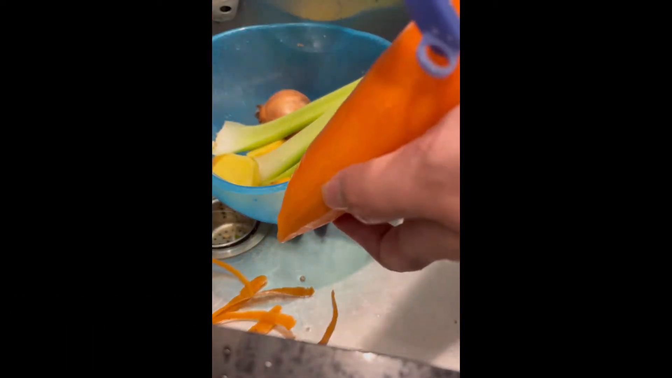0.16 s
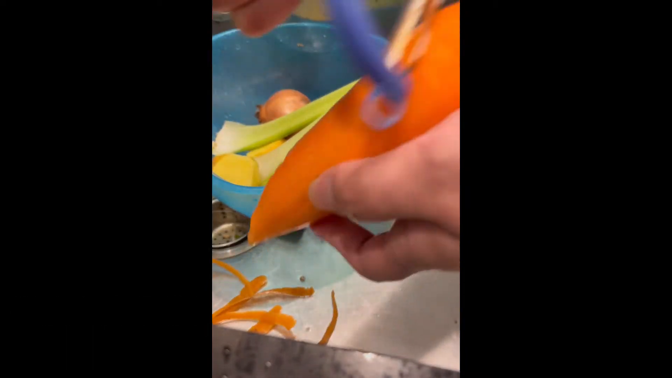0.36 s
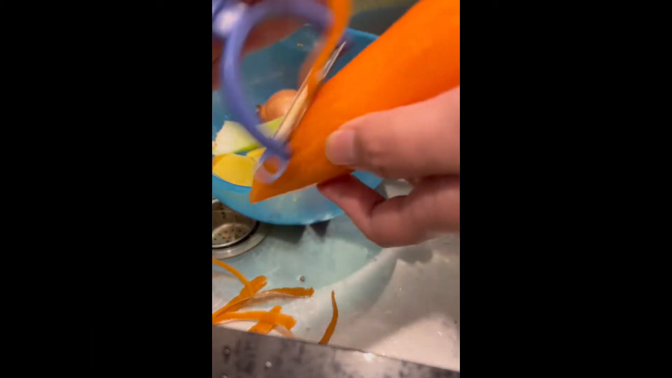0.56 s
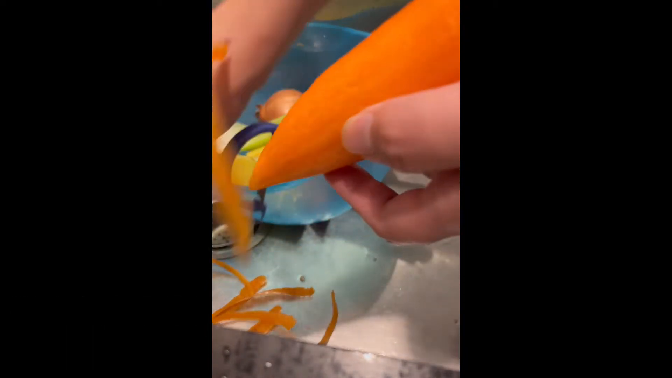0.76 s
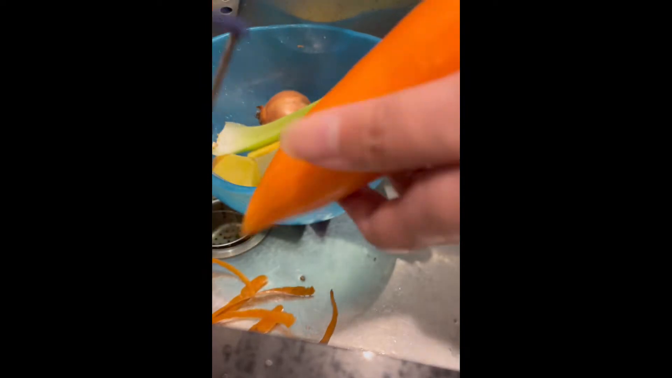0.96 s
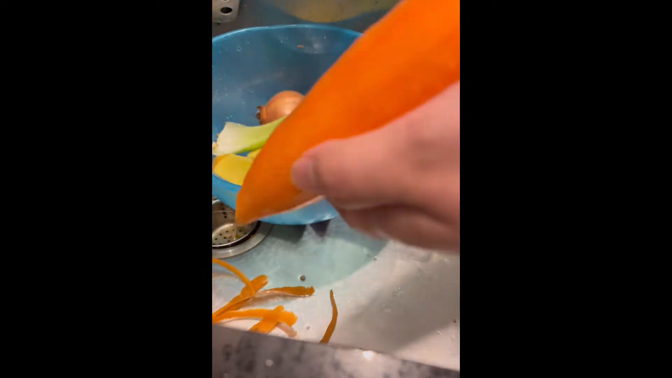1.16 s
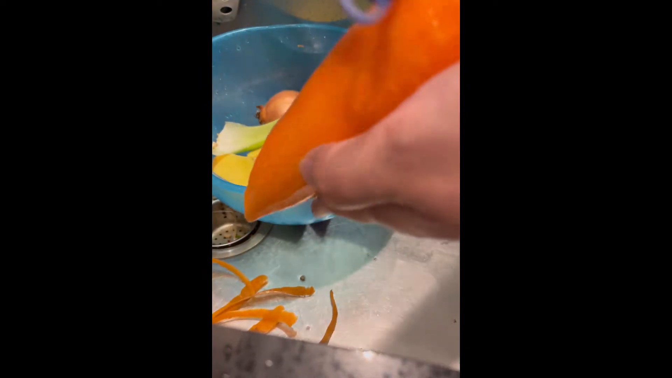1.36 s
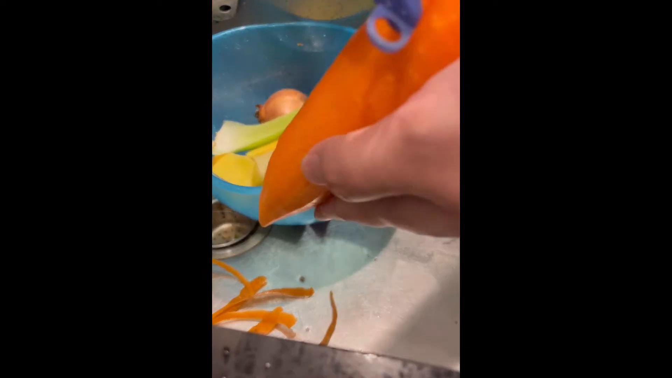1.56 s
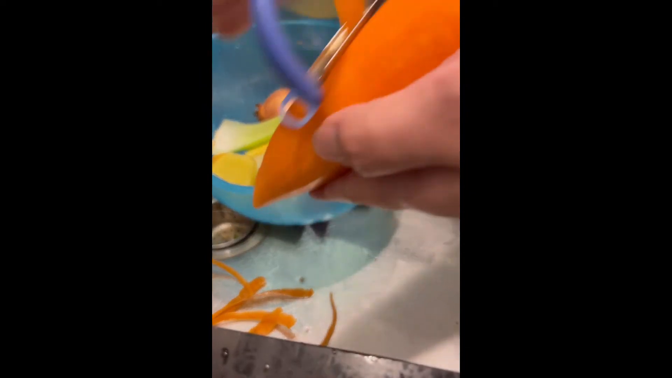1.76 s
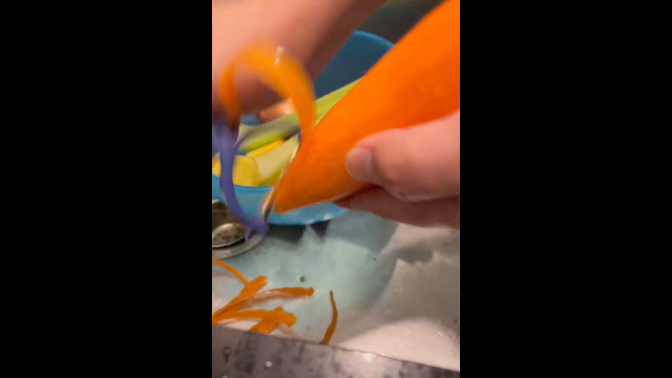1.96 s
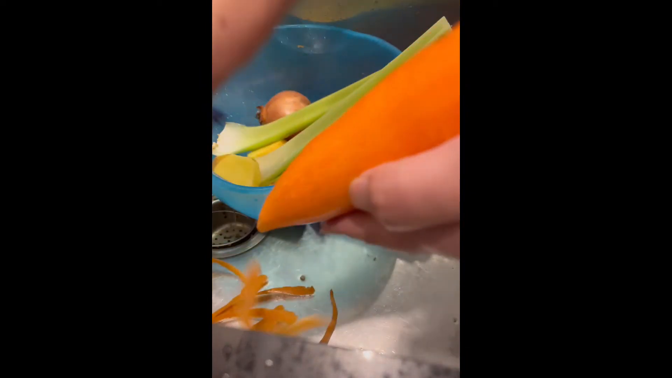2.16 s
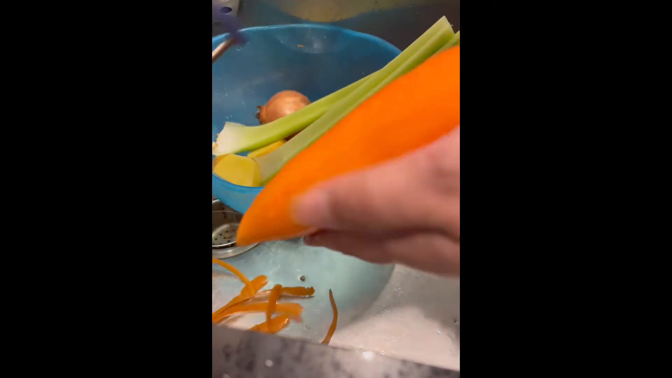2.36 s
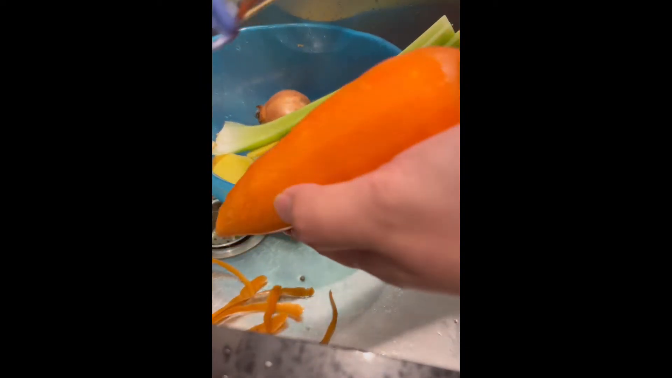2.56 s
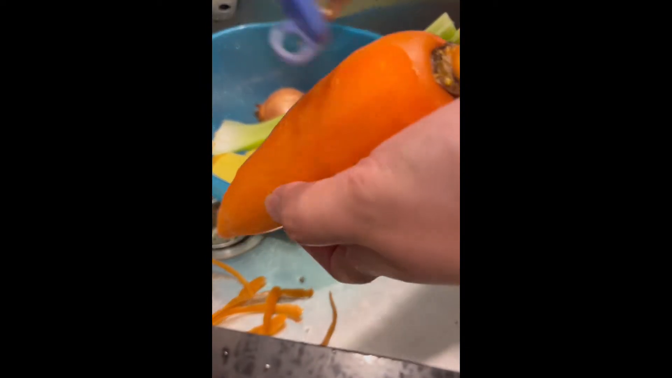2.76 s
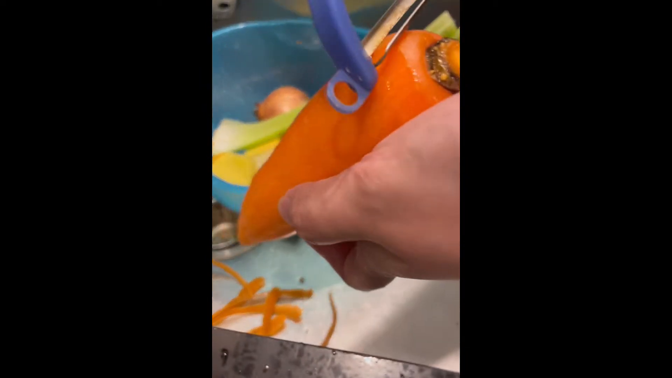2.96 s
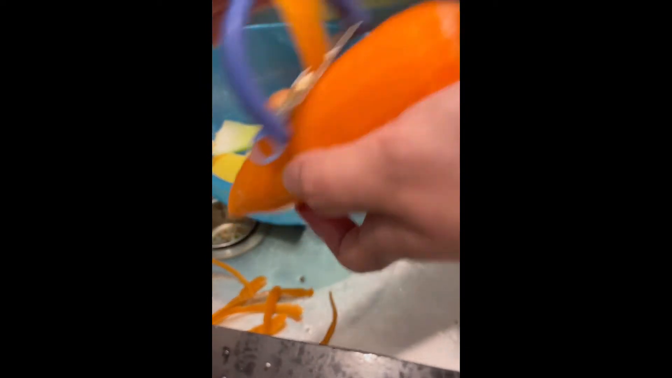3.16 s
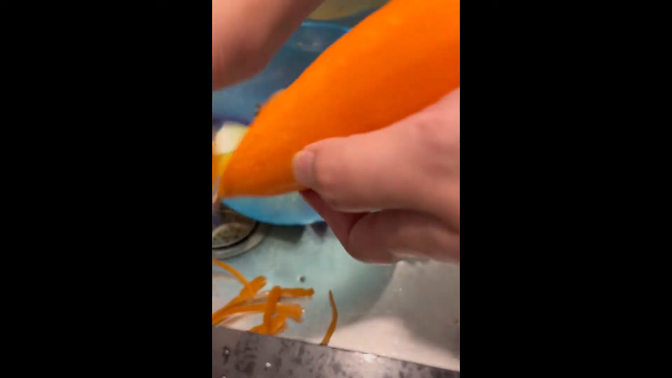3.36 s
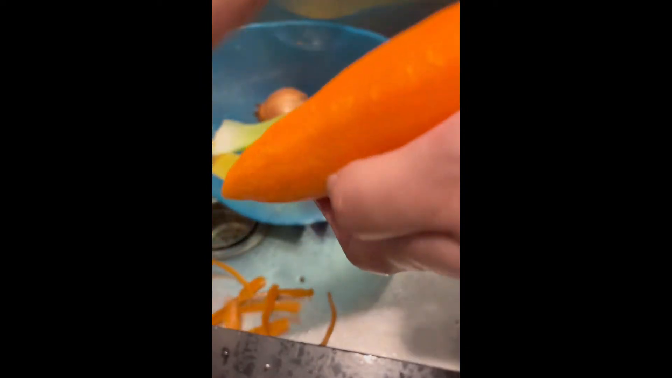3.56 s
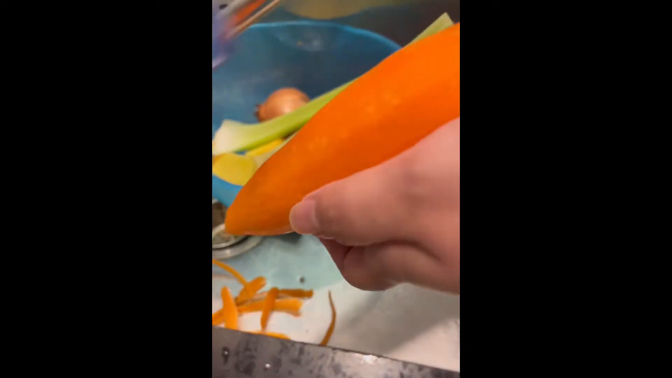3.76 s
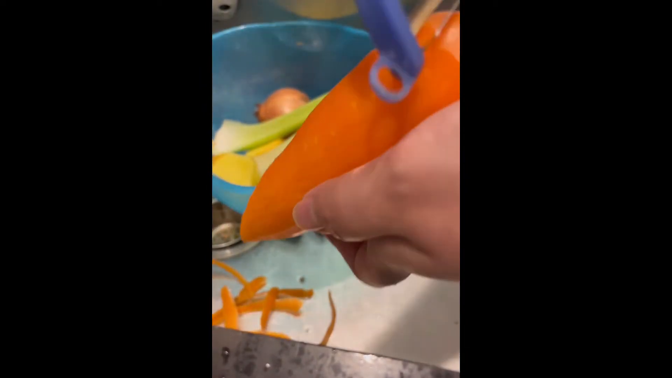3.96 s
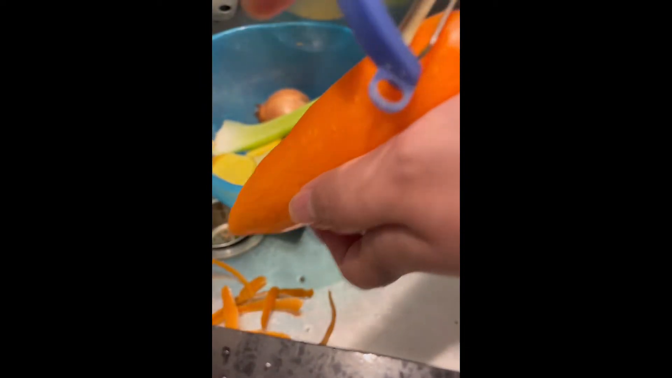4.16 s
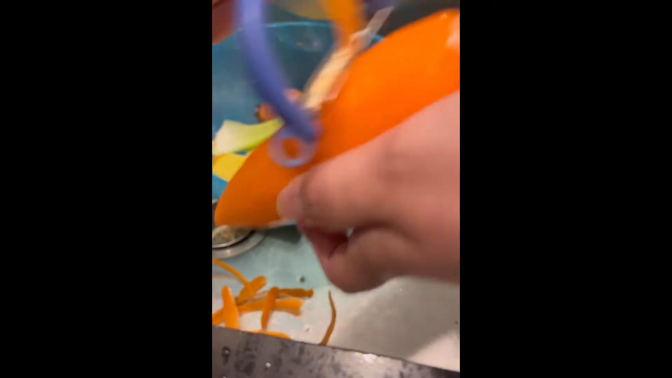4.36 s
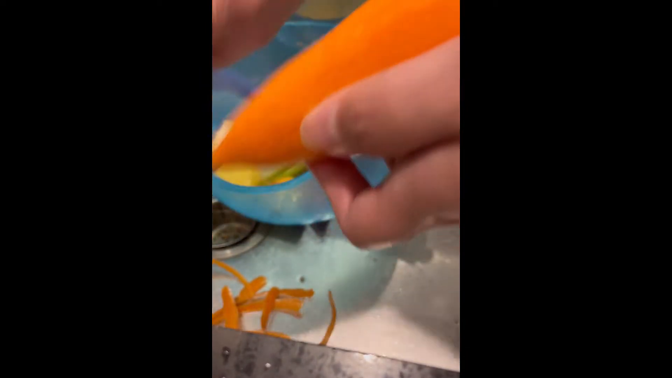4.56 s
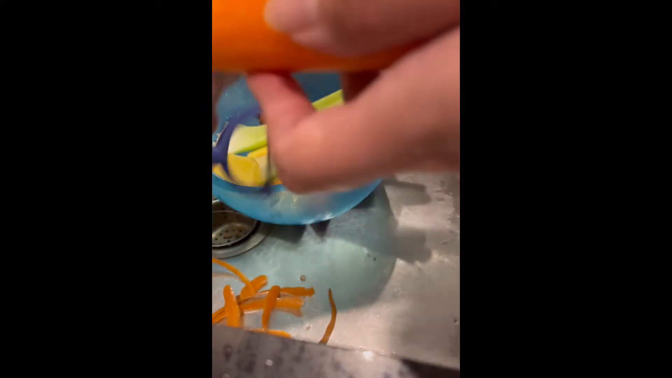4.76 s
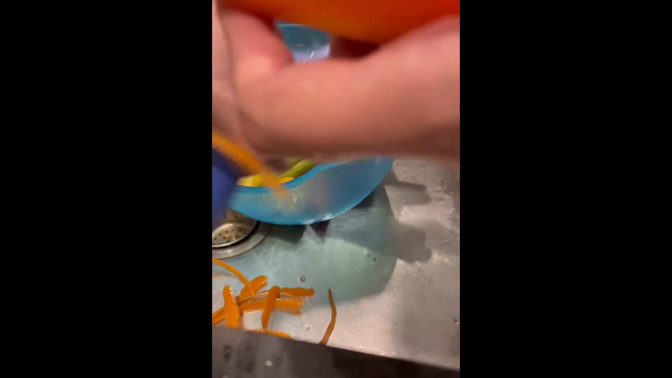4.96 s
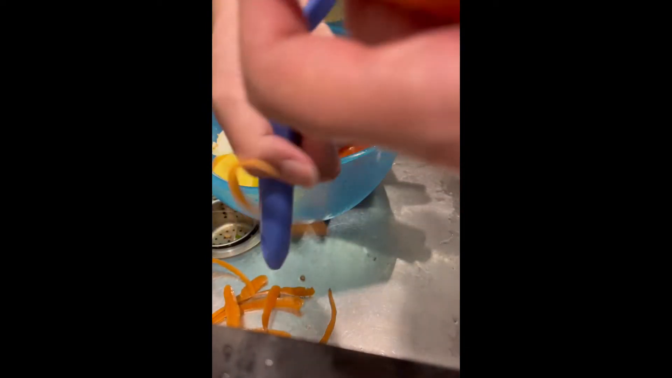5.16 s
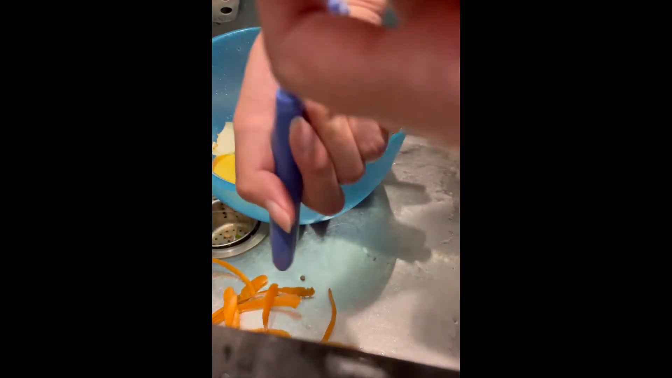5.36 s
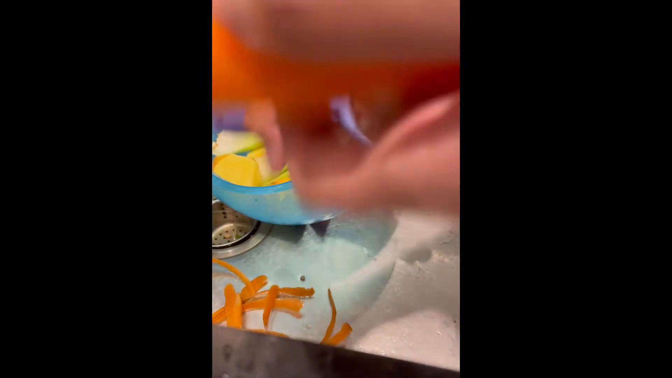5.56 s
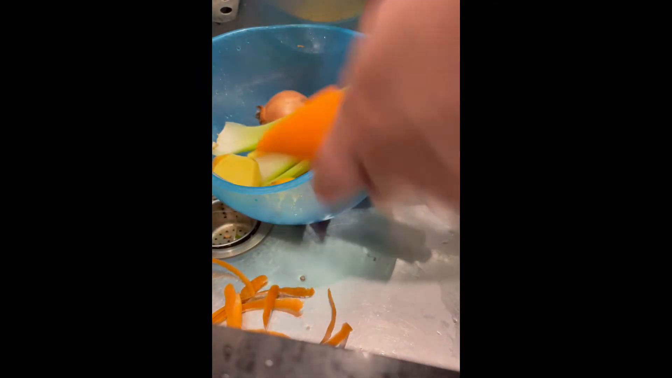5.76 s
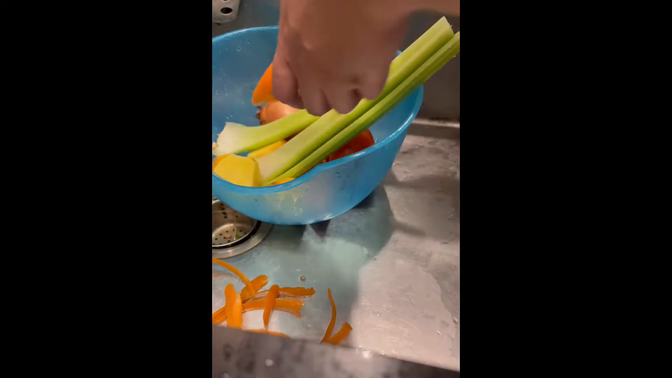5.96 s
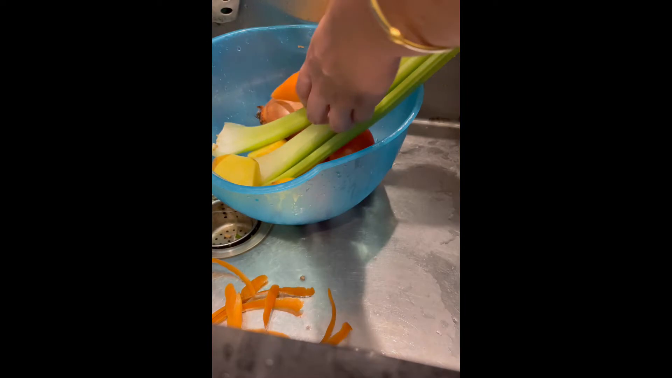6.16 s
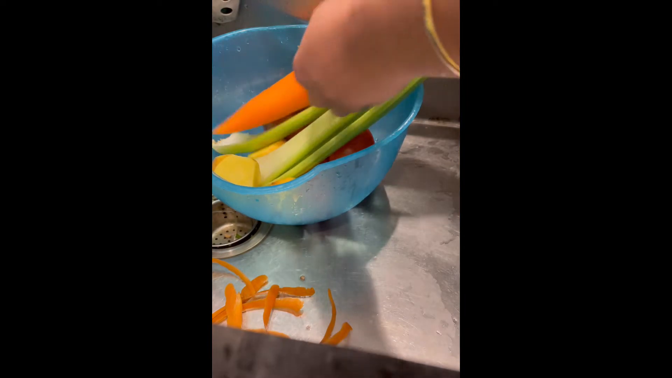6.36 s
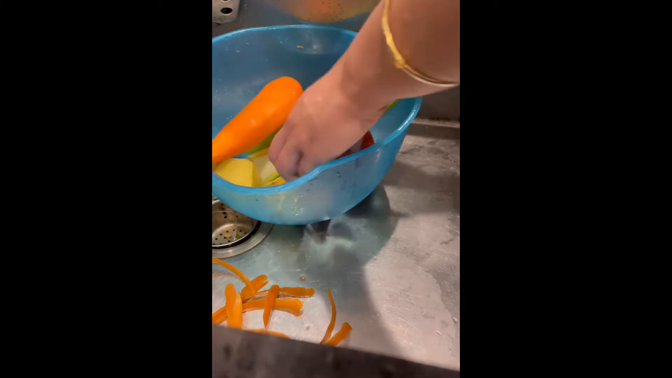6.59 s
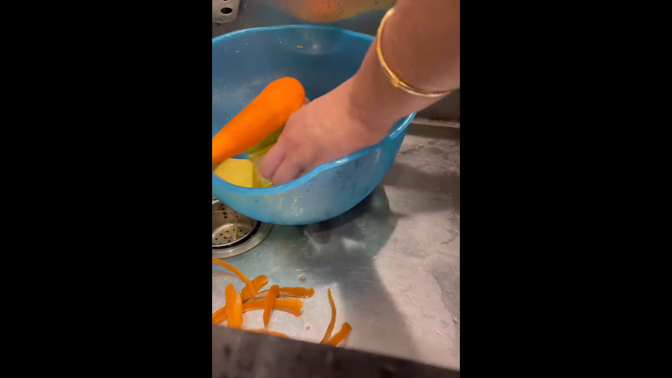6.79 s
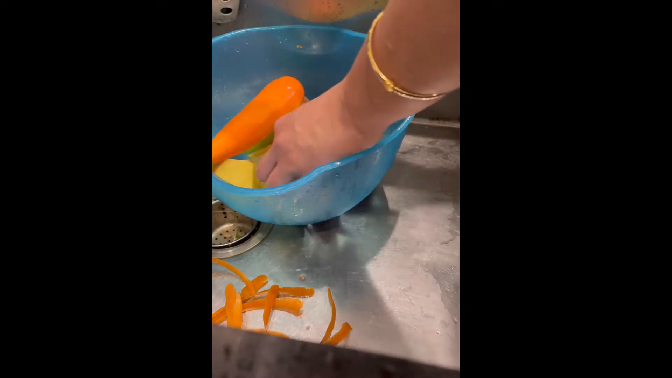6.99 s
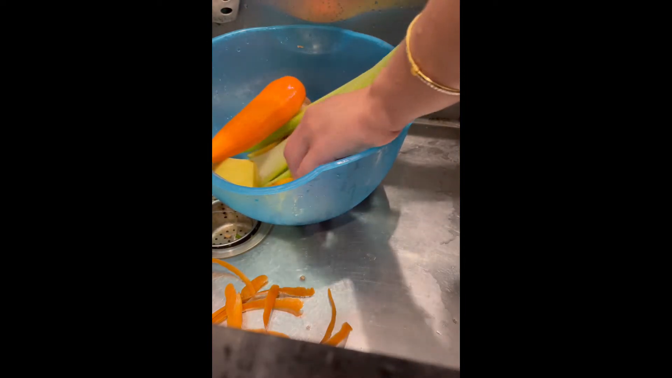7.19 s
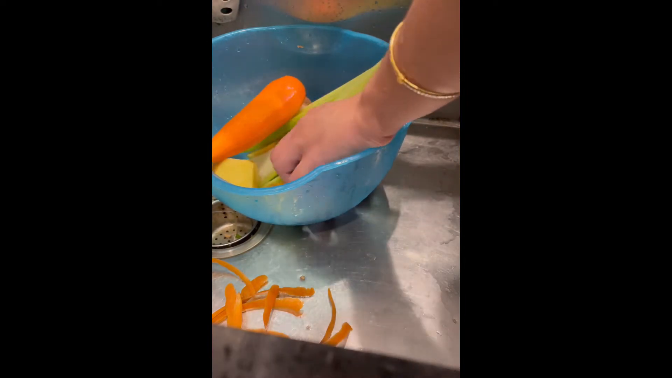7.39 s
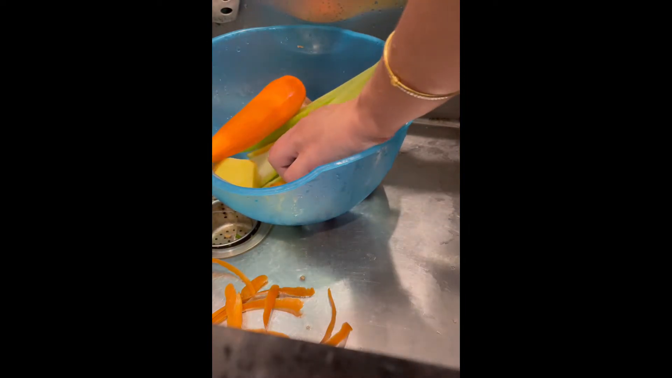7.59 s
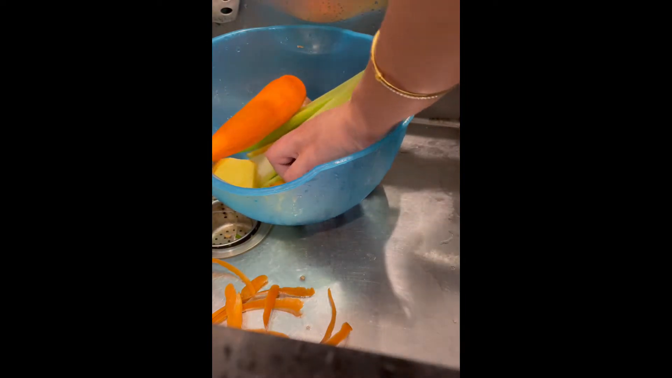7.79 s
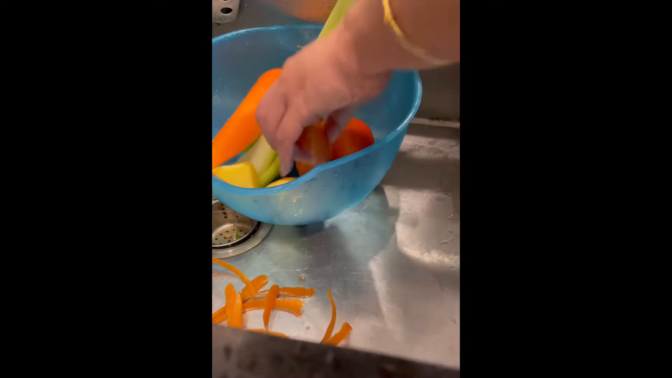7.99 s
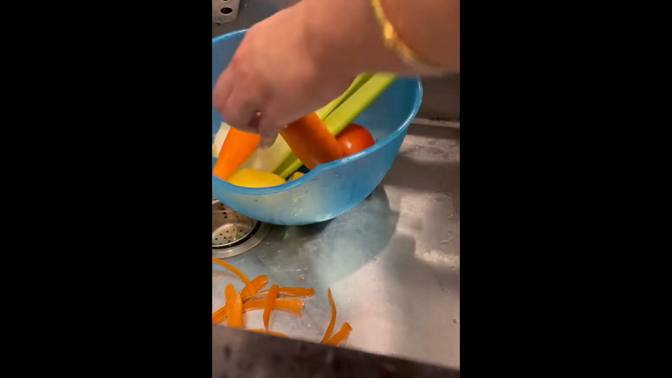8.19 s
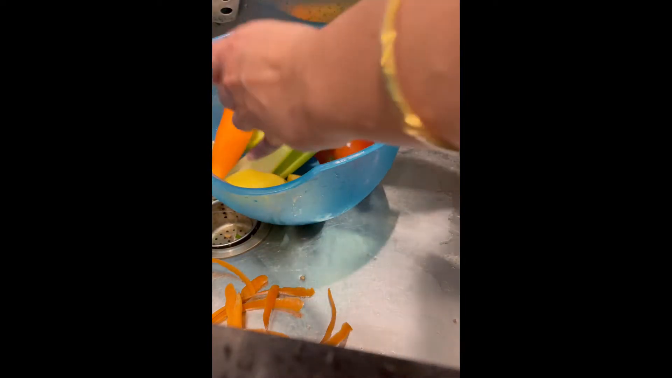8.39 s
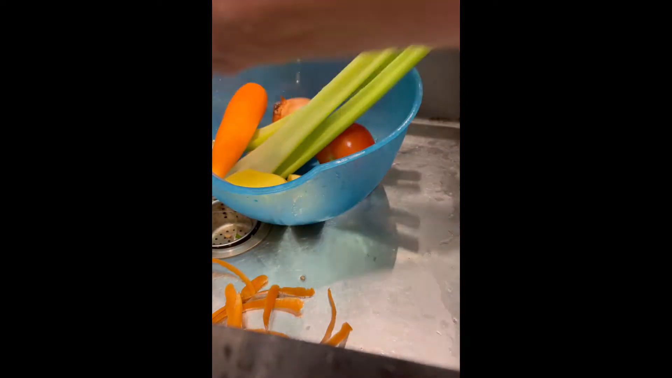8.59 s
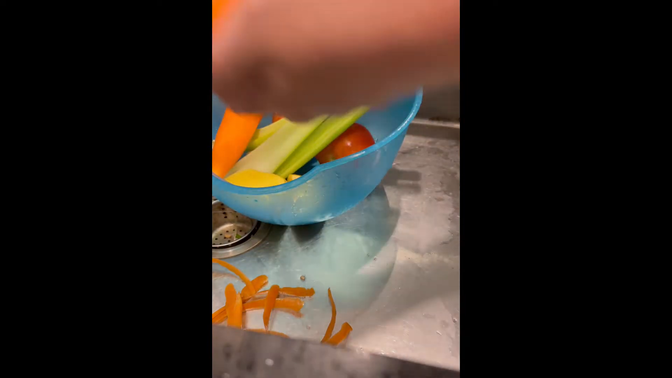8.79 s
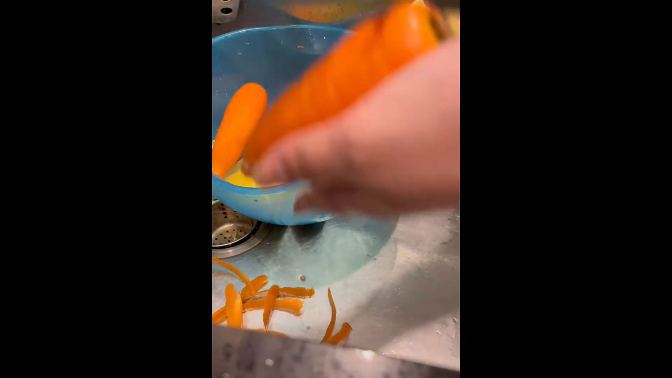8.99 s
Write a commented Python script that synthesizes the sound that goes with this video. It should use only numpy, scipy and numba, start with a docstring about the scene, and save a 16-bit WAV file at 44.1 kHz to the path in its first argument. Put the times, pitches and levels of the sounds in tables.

```python
"""A peeler clicks onto a raw carrot, catches and shaves four long strokes, close up over a steel sink.
Fibres snap under the edge and set the blade ringing. Peel drops, then a hand rummages in a plastic
bowl of vegetables that thud on bowl and sink. A small kitchen hums behind, with a faint whine,
hiss and squeak. The two microphone ports of a phone hear the treble out of step."""
import sys
import numpy as np
from scipy import signal
from scipy.fft import rfft, irfft, next_fast_len
from scipy.io import wavfile
from scipy.ndimage import uniform_filter1d
from numba import njit

SR = 44100
rng = np.random.default_rng(int(sys.argv[2]) if len(sys.argv) > 2 else 0)


def generate_wav(sig):
    """Save sig (samples, or channels by samples) to the path in sys.argv[1] as 16-bit PCM at SR."""
    pcm = np.round(np.clip(np.atleast_2d(sig).T, -1, 1) * 32767).astype(np.int16)
    wavfile.write(sys.argv[1], SR, pcm)


N = 398223
T = np.arange(N) / SR

# drags of the edge: t/s, length/s, bite level/dB, fullest level/dB,
# blade drive over tearing at start/dB, at end/dB, blade pitch at start/Hz, at end/Hz
DRAGS = [(0.111, 0.018, -54, -40.5, -8, -2, 1870, 1830), (0.16, 0.046, -37, -45.5, 0, -9, 1880, 1720),
         (0.288, .36, -36.5, -36.5, -7, 7.5, 1620, 1692), (1.496, 0.029, -42, -41.5, -8, 0.5, 1820, 1856),
         (1.601, 0.32, -37.5, -36.5, -2, 8, 1610, 1715), (2.931, 0.045, -45.5, -42.5, -1.5, -5, 1940, 1860),
         (3.035, 0.28, -35, -36, 4, 2, 1820, 1737), (3.977, 0.06, -49.5, -44.5, 2, 5.5, 1910, 1920),
         (4.246, 0.29, -35.5, -37.5, 0.5, 0.5, 1804, 1726)]
LONG_S = .2  # longer drags are full strokes, shorter ones scuffs


def undb(db):
    return 10 ** (np.asarray(db) / 20)


def unit(x):
    return x / np.sqrt(np.mean(x ** 2))


def on_log(hz, table):
    """Reads (f/Hz, value) points on a log-frequency axis."""
    f, v = np.transpose(table)
    return np.interp(np.log(np.maximum(hz, 1)), np.log(f), v)


def colour(x, table):
    """Filters x by (f/Hz, level/dB) points, falling fast below the first."""
    size = next_fast_len(N)
    hz = np.fft.rfftfreq(size, 1 / SR)
    response = undb(on_log(hz, table)) * np.minimum(hz / table[0][0], 1) ** 2
    return irfft(rfft(x, size) * response, size)[..., :N]


@njit
def band(x, hz, width):
    """State-variable band-pass with a moving centre, gain 1 there."""
    y, b, l = np.empty(len(x)), 0., 0.
    for i in range(len(x)):
        g, k = np.tan(np.pi * hz[i] / SR), width / hz[i]
        v = (b + g * (x[i] + 1e-18 - l)) / (1 + g * (g + k))
        b, l, y[i] = 2 * v - b, l + 2 * g * v, k * v
    return y


def steep_band(x, hz, width):
    """Two band-passes in series, on a steady or moving centre."""
    centre = hz * np.ones(N)
    return band(band(x, centre, float(width)), centre, float(width))


def ring(x, hz, t60):
    """One decaying mode; a unit impulse rings with peak 1."""
    pole = np.exp(2j * np.pi * hz / SR - np.log(1000) / (t60 * SR))
    return signal.lfilter([1], [1, -pole], x).imag


def walk(rate):
    """Random levels held 1 / rate s and smoothed twice; rms 1."""
    hold = int(SR / rate)
    steps = np.repeat(rng.standard_normal(N // hold + 1), hold)
    return unit(uniform_filter1d(uniform_filter1d(steps, hold), hold)[:N])


def gain(s, db):
    """A level curve that is silent outside its span."""
    return undb(np.interp(T, s, db, left=-200, right=-200))


def swell(s, length, db, fade_s=.099):
    """Fades in, holds, fades out."""
    return gain([s, s + fade_s, s + length - fade_s, s + length], [db - 14, db, db, db - 14])


def add(x, s, piece):
    """Adds a piece at time s."""
    i = int(s * SR)
    x[i:i + len(piece)] += piece[:N - i]


def grains(spread_db):
    """Dense snaps of random sign whose sizes scatter."""
    return unit(rng.standard_normal(N) * undb(spread_db * rng.exponential(size=N)))


def tone(hz, waver_db):
    """A sine that wavers in level."""
    return undb(waver_db * walk(15)) * np.sin(2 * np.pi * np.cumsum(hz) / SR)


def diffuse(table, apart):
    """Noise from all round: alike at both ports in the bass, partly unrelated above."""
    mid, side = rng.standard_normal((2, N))
    side = apart * colour(side, [(100, -39), (300, -6.5), (900, 8.5), (3500, 1), (6000, -33)])
    return unit(colour(mid + side * np.array([[1], [-1]]), table))


def kitchen_hum():
    """Low appliance rumble at the back of the room, wandering a little in level."""
    # room tone: f/Hz, relative density/dB
    spectrum = [(25, -8), (50, 7), (100, 3), (200, -2), (400, -10), (800, -18), (1200, -26.5),
                (1800, -31.5), (2600, -31.5), (3500, -40.5), (5500, -45), (8000, -46), (10000, -46.5),
                (15000, -61)]
    return undb(-48 + .16 * walk(3.21)) * diffuse(spectrum, apart=.44)


def whine(hz=10000, ends_s=5.55, rise_db_per_s=.8):
    """A very faint high tone that grows and stops."""
    level = gain([0, ends_s], [-90, -90 + rise_db_per_s * ends_s])
    return level * tone(np.full(N, hz), waver_db=.7)


def hiss(width_hz=200.):
    """Two faint, half-whistling bands of noise."""
    # narrow hisses: t/s, length/s, f/Hz, level/dB
    hisses = [(5.46, 0.39, 5400, -76.5), (8.42, .55, 5540, -73)]
    return sum(swell(s, length, db) * unit(band(rng.standard_normal(N), np.full(N, float(hz)), width_hz))
               for s, length, hz, db in hisses)


def squeak(start_s=7.48, length_s=.31, base_hz=9350, arch_hz=1050):
    """One thin squeak whose pitch rises and falls back."""
    arch = np.sin(np.pi * np.clip((T - start_s) / length_s, 0, 1))
    return swell(start_s, length_s, db=-73) * tone(base_hz + arch_hz * arch, waver_db=2.5)


def rubbing(crackles_per_s=20, crackle_fade_s=.005, deep_in_bowl_s=6.5):
    """Skin and leaves rub softly and unstick now and then, heard directly and through the bowl wall."""
    # handling once the peeling stops: t/s, level/dB
    handling = [(5.0, -83), (5.54, -77), (5.65, -98), (6.04, -67), (6.24, -61.5), (6.43, -61.5),
                (6.78, -72), (7.05, -69), (7.25, -70.5), (7.4, -64), (7.7, -70.5), (7.84, -60), (7.98, -65),
                (8.13, -68.5), (8.51, -72.5), (8.68, -71.5), (9.03, -71.5)]
    # friction heard directly: f/Hz, relative density/dB
    direct_spectrum = [(3000, -7.5), (4200, -0.5), (5500, -1.5), (6500, -3.5), (8000, -3.5), (10500, -3.5),
                       (13000, -8.5), (15200, 1)]
    # friction heard through the wall: f/Hz, relative density/dB
    wall_spectrum = [(900, -6), (1500, -2), (2400, 1), (2900, -3), (3400, -10), (4100, -4), (4600, -20)]
    level = gain(*np.transpose(handling))
    for s, length, *_ in DRAGS:
        if length > LONG_S:
            end = s + length
            level += gain([s - .196, s], [-65, -62.5])  # the resting blade slides, ever harder
            level += gain([end, end + 1], [-70.5, -122.5])  # fingers shift on the carrot
            level += gain(end + np.array([.202, .222, .3]), [-87, -73, -87])  # peel brushes off the blade
    slips = undb(.6 * walk(60) + 2.3 * walk(11))
    unstick = (rng.random(N) < crackles_per_s / SR) * rng.exponential(size=N)
    slips *= 1 + signal.lfilter([1], [1, -np.exp(-1 / (crackle_fade_s * SR))], unstick)
    direct = diffuse(direct_spectrum, apart=1)
    wall_db = -5.5 + 5 * (T > deep_in_bowl_s) + 3 * walk(4)
    return slips * level * (direct + undb(wall_db) * diffuse(wall_spectrum, apart=.19))


def bowl_and_sink():
    """Each landing rocks the bowl on the sink floor, rattles its wall and ticks; a hand stirs both."""
    # hand pushing vegetables about: t/s, relative level/dB
    rummage = [(6.049, -50), (6.16, -31.5), (6.47, -37), (6.7, -32.5), (6.92, -41.5), (7.42, -38),
               (7.68, -62), (7.87, -32), (8.07, -30.5), (8.27, -40.5), (8.4, -26.5), (8.55, -44),
               (8.651, -53)]
    # landings: t/s, relative thud level/dB, rocking f/Hz, rattle offset/dB, tick offset/dB
    knocks = [(0.767, -37, 222, -5.5, -29), (0.9, -37.5, 196, -11, -24), (2.177, -38.5, 97, 1, -2.5),
              (2.239, -41, 109, -9, -30), (3.503, -29.5, 230, -8, -21), (3.528, -31, 126, -15, -33),
              (3.555, -36, 105, -28, -38), (5.264, -35, 152, -0.5, -17.5), (5.285, -31, 106, -20, -34),
              (6.123, -19, 89.5, -17.5, -31), (6.165, -19.5, 118, -26, -39),
              (6.255, -24.5, 124, -17.5, -48), (6.324, -10, 166, -26, -41),
              (6.34, -13.5, 136, -18.5, -30.5), (6.378, -22, 128, -45, -50), (6.493, -9, 148, -16.5, -34),
              (6.507, -8, 94.7, -10.5, -18), (6.548, -25.5, 73, -7, -23.5), (6.567, -14.5, 123, -12, -27.5),
              (6.654, -24, 103, -12, -25), (6.747, -40, 140, 4.5, -11.5), (6.791, -34, 197, -10.5, -24),
              (6.929, -33, 121, -9, -23.5), (7.026, -41.5, 69.5, -17, -7.5), (7.087, -33, 136, -12, -24),
              (7.146, -34, 193, -9, -23), (7.176, -28, 97, -21, -38), (7.368, -23, 108.4, -16, -33),
              (7.432, -32, 90, -19, -19), (7.821, -30, 239, -4.5, -18), (7.903, -23.5, 83, -15, -26),
              (7.945, -12, 97.5, -45, -43.5), (8.03, -32, 115, -8.5, -22), (8.091, -13.5, 123.4, -3.5, -15),
              (8.138, -15, 93.4, -19.5, -33), (8.208, -23.5, 96, -30, -42), (8.34, -7, 161.4, -9.5, -21),
              (8.372, -18, 153, -26, -31), (8.408, -19, 115.6, -17.5, -27.5), (8.491, -28.5, 107, -29, -39)]
    # modes of the steel sink: f/Hz, relative level/dB, t60/s
    sink_modes = [(55, -20, .2), (72.5, -13.5, 0.32), (97.1, 0.5, 0.26), (128.8, 0.5, 0.14),
                  (147.6, 3, 0.14), (200, 1, 0.15), (232, -1.5, 0.17)]
    # modes of the plastic bowl: f/Hz, level/dB, t60/s
    bowl_modes = [(332, -2, 0.093), (364.6, -4, 0.12), (431.7, 2, 0.095), (542.7, -2.5, 0.061),
                  (580, -2.5, 0.05), (807, -12, 0.062), (983, -11.5, 0.044), (1233, -20.5, 0.082)]
    # bands of the contact tick: f/Hz, width/Hz, level/dB
    tick_bands = [(814, 750, 7.5), (1535, 1060, 5.5), (2167, 980, 5.5), (3740, 1500, -24),
                  (5080, 1000, -8.5), (11000, 2200, -17)]
    stir = gain(*np.transpose(rummage)) * undb(3.1 * walk(25)) * rng.standard_normal((2, N))
    rock, rattle, ticks = undb(-49) * stir[0], np.zeros(N), np.zeros(N)
    age = np.arange(int(.12 * SR)) / SR
    rattle_shape = np.exp(-age / .0022) + .26 * np.exp(-age / .026)
    tick_shape = np.minimum(age / .0012, 1) * (np.exp(-age / .003) + .54 * np.exp(-age / .018))
    for s, thud_db, hz, wall_db, tick_db in knocks:
        turns = age * hz
        two_cycles = np.sin(2 * np.pi * turns) * np.sin(np.pi * np.minimum(turns / 1.99, 1))
        add(rock, s, undb(thud_db - 12.5) * hz / SR * two_cycles)
        add(rattle, s, undb(thud_db + wall_db - 19.5) * rattle_shape)
        add(ticks, s, undb(thud_db + tick_db + 7) * tick_shape)
    rattle = rattle * rng.standard_normal(N) + undb(-55) * stir[1]
    ticks *= grains(.35)
    sink = sum(undb(db + 12.5) * ring(rock, hz, t60) for hz, db, t60 in sink_modes)
    bowl = sum((-1) ** k * undb(db) * ring(rattle, hz, t60) for k, (hz, db, t60) in enumerate(bowl_modes))
    contact = sum(undb(db) * steep_band(ticks, hz, width) for hz, width, db in tick_bands)
    return sink + bowl + contact


def edge_drags(bite_s=.013, lift_s=.028, edge_db=-27.5):
    """The edge bites, slackens, cuts fully and lifts. Gives tear, shake and core gains and blade pitch."""
    tear, shake, core, hz = np.zeros(N), np.zeros(N), np.ones(N), np.full(N, 1700.)
    for s, length, bite_db, full_db, ring_db, end_ring_db, pitch, end_pitch in DRAGS:
        slack, fullest = .29 * length, .61 * length
        when = s + np.array([0, min(bite_s, slack / 2), slack, fullest, length,
                             length + min(lift_s, length / 2)])
        slack_db = min(bite_db, full_db) - 3.5 * min(length / LONG_S, 1)
        force = gain(when, [bite_db + edge_db, bite_db, slack_db, full_db, full_db - 4.5, full_db + edge_db])
        progress = (T - s) / length
        tear += force
        shake += force * undb(ring_db + (end_ring_db - ring_db) * np.clip(progress, 0, 1) ** 1.07)
        # the narrow core of the ring sings up towards the end of a drag
        core = np.where((T >= s) & (T < when[-1]), undb(4.5 * (progress - 1)), core)
        glide = np.interp(T, [s, s + length], [pitch, end_pitch])
        hz = np.where((T >= s) & (T < when[-1] + .1), glide, hz)
    chatter = undb(1.3 * walk(120) + 2.3 * walk(33.95))  # the edge sticks and slips
    return tear * chatter, shake * chatter * undb(3.75 * walk(25.28)), core, hz


def peeler_and_ticks(click_hz=1880, hump_width_hz=320, core_width_hz=110):
    """Fibres snap under the edge and shake blade and frame; later dry ticks share that timbre."""
    # blade taps and catches while peeling; the late rows are small dry ticks from rummaging in the bowl:
    # t/s, relative level/dB, ring offset/dB
    clicks = [(0.0064, -32.5, -4), (0.0223, -24, -4), (0.275, -33.5, -15), (0.6482, -33, -22),
              (0.874, -48.5, -11), (1.0243, -53.5, -4), (1.39, -32.5, 1.5), (1.4038, -23, -3),
              (1.549, -31, -7), (2.1778, -33.5, -12), (2.8471, -29, -4), (2.8558, -22.5, -6),
              (3.365, -45, -18), (3.4987, -47, -26), (3.926, -34, 4), (3.9367, -17, -9), (4.088, -35, -14),
              (4.122, -37, -12), (4.16, -42.5, -23), (4.201, -44, -35), (4.228, -43.5, -21),
              (4.664, -50.5, -2), (5.106, -58, -5), (5.225, -57, -16), (5.2957, -52, -11),
              (5.665, -36, -28), (7.03, -49, -3), (7.45, -55, -10), (8.0248, -41, -8), (8.318, -42.5, -8)]
    # tearing fibres: f/Hz, relative density/dB
    tear_spectrum = [(550, -3.5), (800, -4), (1280, -47), (1500, 9), (2100, -39.5), (2900, 0), (4600, -2.5),
                     (5500, 1.5), (6400, -1), (8600, -4.5), (10600, -6.5), (13300, -6.5), (15200, -9.5)]
    # higher modes of blade and frame: multiple of the frame pitch, width/Hz, level over tearing/dB
    frame_modes = [(1.2, 450, -10), (1.45, 500, -8), (2.1, 500, -19), (2.4, 500, -17), (3.25, 800, -11),
                   (4.23, 600, -19), (6.25, 2400, -9)]
    tear, shake, core, hz = edge_drags()
    age = np.arange(int(.03 * SR)) / SR
    for s, db, ring_db in clicks:
        fade_s = .0048 * undb(-.02 * (db + 22))  # harder clicks are shorter
        push = np.minimum(age / .00064, 1) * (np.exp(-age / fade_s) + .038 * np.exp(-age / .01))
        add(tear, s, undb(db - 7) * push)
        add(shake, s, undb(db + ring_db + 1) * push)
        if not any(start <= s <= start + length for start, length, *_ in DRAGS):
            hz[int(s * SR):int((s + .03) * SR)] = click_hz
    # snaps reach the two ports a little differently
    snaps = grains(1.98) + .027 * grains(1.5) * np.array([[1], [-1]])

    def mode(drive, centre, width):
        """A resonance fed by the snaps, near rms 1 at unit drive."""
        ringing = np.array([steep_band(port * drive, centre, width) for port in snaps])
        return ringing / np.sqrt(np.pi * width / 2 / SR)

    # the stiffer modes follow the grip on the blade only in part, and come and go
    frame_hz = 1700 * (hz / 1700) ** .38
    frame = sum(undb(db) * mode(tear * undb(2.5 * walk(12)), k * frame_hz * (1 + .015 * walk(6.5)), width)
                for k, width, db in frame_modes)
    blade = undb(-5) * mode(shake, hz, hump_width_hz) + undb(-8) * mode(shake * core, hz, core_width_hz)
    fibres = undb(-.5) * unit(colour(snaps, tear_spectrum)) * tear
    return fibres + blade + frame


def echoes(near, basin_db=-22.5, basin_t60_s=.049, room_db=-17, room_t60_s=.32):
    """Quick reflections off the basin and longer ones off the kitchen walls; each port gets its own."""
    age = np.arange(int(.4 * SR)) / SR
    basin, room = undb(-60 * age / basin_t60_s), undb(-60 * age / room_t60_s)
    decay = undb(basin_db) * basin / np.linalg.norm(basin) + undb(room_db) * room / np.linalg.norm(room)
    tail = rng.standard_normal((2, len(age))) * decay
    tail = signal.sosfilt(signal.butter(2, 600, "high", fs=SR, output="sos"), tail)
    return signal.fftconvolve(near, tail, axes=1)[:, :N]


def scene():
    """Close work at the sink and its echoes, over soft rubbing and the room tone."""
    near = peeler_and_ticks() + bowl_and_sink() + whine() + squeak() + hiss()
    return near + echoes(near) + rubbing() + kitchen_hum()


def record(dry, low_hz=41.5, top_hz=15780):
    """The phone drops the deep bass and the very top; its ports differ in phase and level by frequency."""
    # phase between the ports: f/Hz, left lead/rad
    port_lead = [(0, 0), (300, -.04), (900, .1), (2200, .45), (2900, 1.7), (3600, .9), (4300, .95),
                 (5000, 0), (7700, 3.14), (10800, 6.28), (14200, 9.42), (17000, 12)]
    # balance of the ports: f/Hz, left minus right/dB
    port_balance = [(100, -.7), (300, -2.5), (860, 1.5), (1550, -3.2), (2300, 0), (5000, 0)]
    dry = signal.sosfilt(signal.butter(2, low_hz, "high", fs=SR, output="sos"), dry)
    size = next_fast_len(N + 4096)
    hz = np.fft.rfftfreq(size, 1 / SR)
    left = np.exp(.5j * np.interp(hz, *np.transpose(port_lead))) * undb(on_log(hz, port_balance) / 2)
    ports = irfft(rfft(dry, size) * np.array([left, 1 / left]), size)[:, :N]
    return signal.sosfilt(signal.ellip(10, .2, 70, top_hz, fs=SR, output="sos"), ports)


dry = scene()
out = record(dry)
generate_wav(out)
```